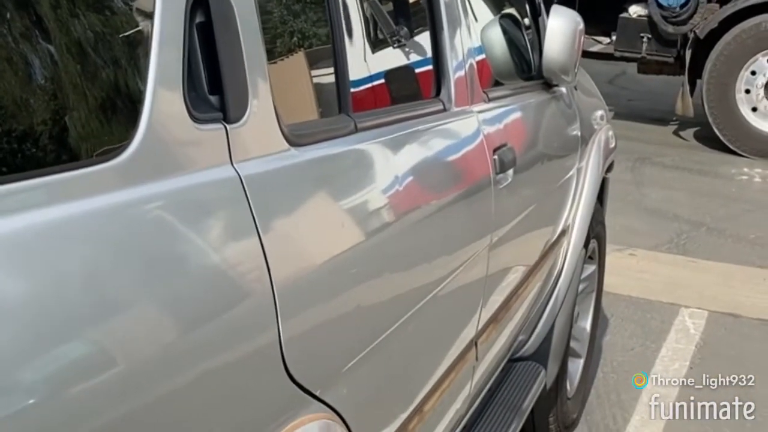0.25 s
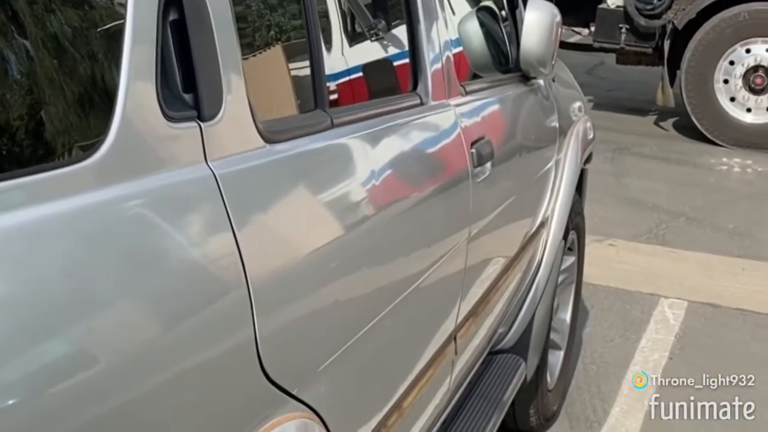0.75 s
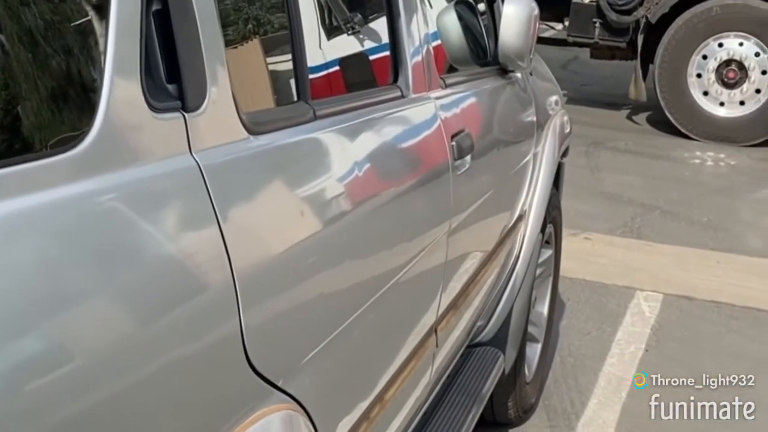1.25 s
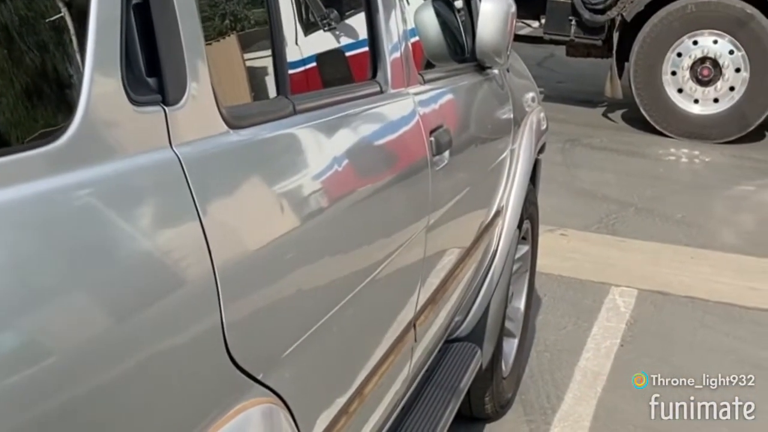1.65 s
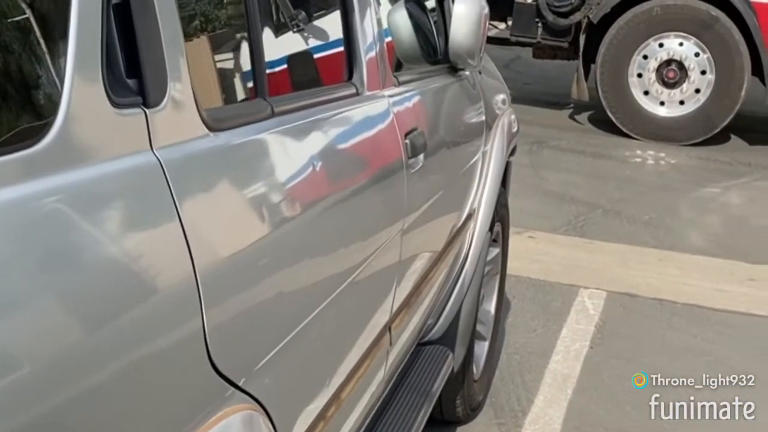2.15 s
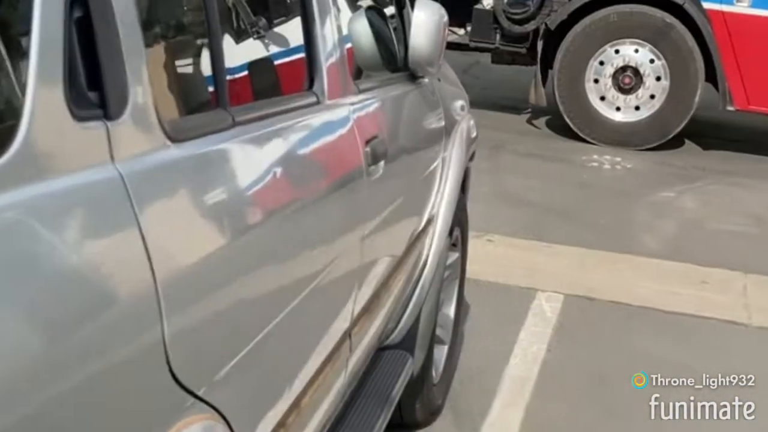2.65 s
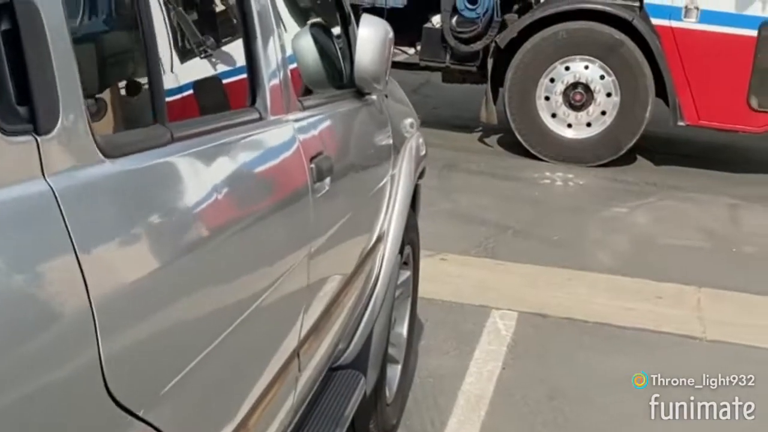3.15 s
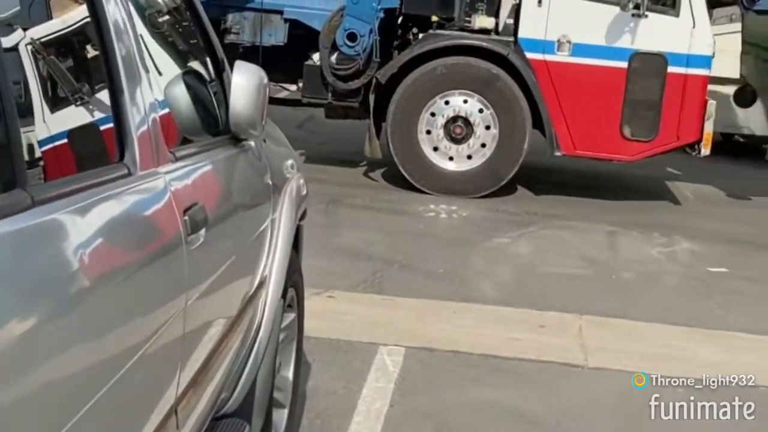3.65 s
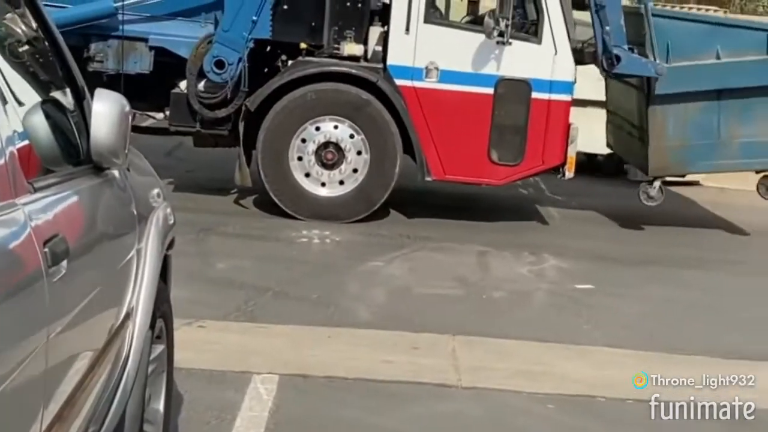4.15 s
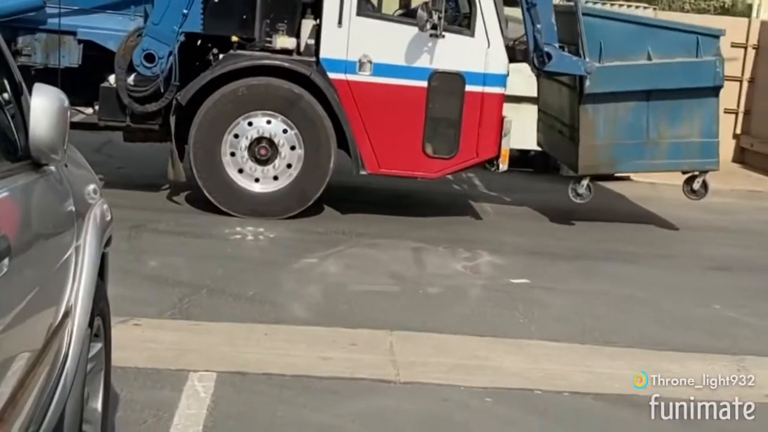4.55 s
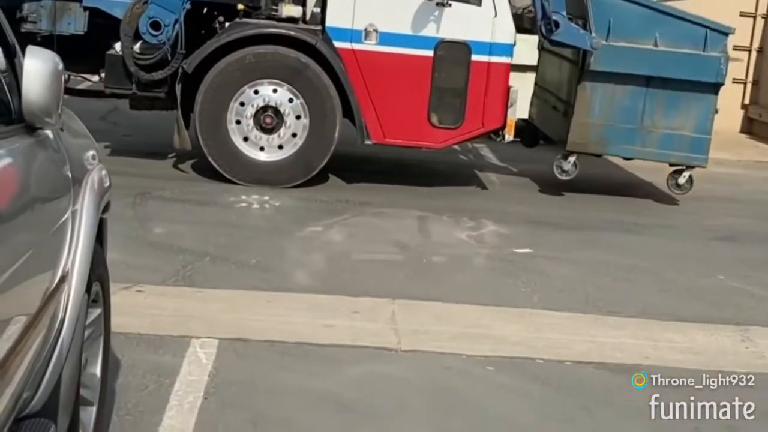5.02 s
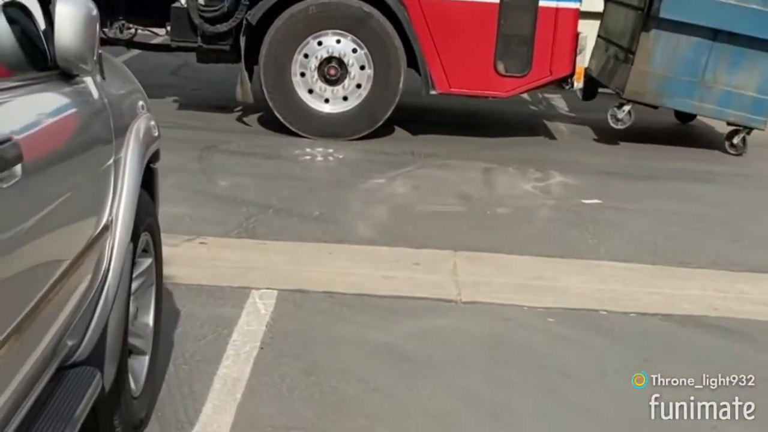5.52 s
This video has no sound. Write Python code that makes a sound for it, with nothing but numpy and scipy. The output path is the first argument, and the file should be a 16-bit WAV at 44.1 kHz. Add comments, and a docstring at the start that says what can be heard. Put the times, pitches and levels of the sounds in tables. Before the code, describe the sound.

Across a parking lot, a garbage truck's diesel rumbles under a wavering hydraulic pump whine. A brief clattering knock comes early, then squeaks and soft bumps. Near four seconds oil hiss surges and the steel dumpster slams in a rapid run of booming bangs with rattling lids and pins; another cluster follows after five seconds. Outdoor stereo microphone, a few metres away, short scattered echoes.

```python
"""A bin knocks over a fast diesel and its whining pump: a front-loading refuse truck lowers a dumpster.
The scene is a parking lot, heard from behind a parked car. Crank-locked tones, chopped noise and
narrow resonances make the truck; valves hiss and dry pivots squeal. The bin bangs on the forks:
damped modes and dying noise boom from its walls, while grit, loose lids, casters and a pin rattle along.
Scattered echoes and a two-port microphone set it in stereo."""
import sys
import numpy as np
from scipy import signal
from scipy.fft import rfft, irfft, next_fast_len
from scipy.io import wavfile
from scipy.ndimage import uniform_filter1d, minimum_filter1d

SR = 44100
rng = np.random.default_rng(int(sys.argv[2]) if len(sys.argv) > 2 else 0)


def bounce(signal):
    """Save signal as a 16-bit WAV file at the path given by the first command-line argument."""
    frames = np.transpose(np.atleast_2d(signal))
    limited = np.clip(frames, -1, 1)
    pcm = np.round(limited * 32767).astype(np.int16)
    wavfile.write(sys.argv[1], SR, pcm)


N = 254846
TIME = np.arange(N) / SR  # s

# echoes of the yard: (frequency [Hz], t60 [s])
YARD_T60 = [(60, 0.044), (500, 0.24), (2000, 0.45), (10000, 0.18)]
# engine and fan roar, relative spectrum: (frequency [Hz], density [dB per Hz])
ROAR = [(20, 13), (35, -20), (55, 4), (110, -4), (200, -3.5), (350, -10), (520, -6), (750, -19.5),
        (1300, -25), (1900, -24), (2700, -35.5), (4000, -29.5), (8000, -94)]
# the roar grows with the weight on the arms: (time [s], level [dB])
LOAD = [(0, -24), (.75, -26), (1.4, -28.5), (3.9, -31), (4.5, -22.5), (5.1, -29.5), (5.78, -26.5)]
# resonances that sing in the running truck: (frequency [Hz], width [Hz], level [dB])
SINGING = [(1010, 45, -59.5), (1770, 60, -56), (2030, 30, -54), (2690, 51, -66.5)]
# oil hissing through the valves, relative spectrum: (frequency [Hz], density [dB per Hz])
HISS = [(1000, -9), (2500, 2), (3800, -2.5), (5300, -0.5), (7000, 2.5), (8700, 1), (10300, 0),
        (11800, -15.5), (13500, -2), (16000, -21)]
# the oil hisses steadily, and surges when a valve opens to drop the bin
HISS_DB = -47
# surge start [s], height before its fade [dB], opening time [s], fade time constant [s]
VALVE_S, VALVE_DB, VALVE_OPEN_S, VALVE_FADE_S = 3.71, 9, 0.19, 0.29
# the pump's whine follows the engine speed: (time [s], pitch [Hz], level [dB])
PUMP_WHINE = [(0, 563, -39.5), (.6, 591.7, -49), (.72, 606, -34), (.87, 600.4, -41.5), (.98, 599, -30.5),
              (1.17, 624, -42.5), (1.45, 619.6, -41), (1.65, 609.6, -32.5), (2.2, 582.5, -36),
              (2.5, 569, -37), (2.75, 562.4, -35), (3.05, 570.7, -40), (3.35, 577.5, -40.5),
              (3.65, 577, -41), (3.9, 563.9, -38), (5.78, 579.9, -47)]
PUMP_ORDER = 21  # whine cycles per crank turn
# steady tones of the drive: (multiple of crank speed [ratio], level [dB])
DRIVE_ORDERS = [(2, -49.5), (3, -42.5), (4.5, -45.5), (6, -50), (10, -48), (15, -42.5), (18, -69),
                (24.5, -55), (42, -52.5), (51, -71), (63, -55), (84, -100)]
# the drive's tones come clear past the parked car: (time [s], gain [dB])
DRIVE_LEVEL = [(0, -1), (1.9, -6), (2.5, -2.5), (3.3, 1), (3.9, 1.5), (5.78, -4.5)]
# valves and dry pivots squeal or rasp: (time [s], length [s], pitch [Hz], width [Hz], level [dB])
SQUEALS = [(0.152, 0.24, 2250, 164, -45), (0.732, 0.16, 2223, 88, -44), (1.097, 0.73, 2052, 443, -51),
           (1.505, 0.23, 1060, 238, -43), (1.8, 0.57, 1950, 500, -49), (2.166, 0.34, 2302, 45, -61),
           (2.621, 0.21, 1721, 990, -42), (3.251, 0.77, 1174, 129.2, -47.5), (3.489, 0.14, 1380, 90, -44),
           (3.581, 0.26, 1460, 900, -43), (3.346, 0.53, 2850, 350, -51.5), (5.163, 0.12, 2037, 109.9, -40),
           (5.28, 0.13, 1050, 200, -29)]
# loose lids, chains and casters: (time [s], level [dB], share of ringing [0-1])
CLINKS = [(0.048, -37, 0.01), (0.182, -37, 0), (0.72, -39.5, 0), (0.972, -39, 0.41), (4.244, -33, 0.05),
          (4.775, -41, 0.01), (5.027, -42.5, 0.01), (5.183, -45, 0.01), (5.345, -36, 0.6), (5.361, -32, 0)]
# the small steel they ring with: (frequency [Hz], level [dB], t60 [s])
LATCH = [(2050, -21, 0.27), (6030, 1.5, 0.17), (5830, 18, 0.081), (8100, 7, 0.17), (11200, 2, 0.053),
         (10560, 19, 0.33)]
# a loose pin rattles in the arms: (time [s], length [s], level [dB], overtone [dB])
PINGS = [(0.405, 0.039, -29, -10), (.465, 0.047, -42, -4), (0.525, 0.026, -32, -21), (3.985, 0.17, -33, -6),
         (4.081, 0.015, -25, -23), (4.095, 0.025, -31, -1), (4.125, 0.082, -33, 3), (4.282, 0.048, -33, -3),
         (4.335, .05, -43, -9), (4.416, 0.065, -38, -6), (5.353, 0.028, -39, -15)]
# the pin's tone and overtone: (frequency [Hz], t60 [s])
PIN = [(4770, 0.11), (8850, 0.068)]
# sharp steel cracks and short clatter at the blows: (time [s], length [s], level [dB], pitch [Hz], t60 [s])
CLATTER = [(0.34, .02, -17, 598, 0.081), (0.356, .012, -25, 4350, 0.04), (.364, .025, -19, 377, .14),
           (0.382, 0.036, -33, 1914, 0.092), (.41, 0.062, -32, 947, .1), (3.977, 0.079, -31, 2820, .07),
           (3.981, .07, -29, 1245, 0.082), (4.082, 0.019, -32, 2290, 0.054),
           (4.152, 0.011, -15, 1317, .035), (4.153, 0.0069, -19.5, 2890, 0.026),
           (4.185, 0.12, -34.5, 2416, 0.09), (4.323, 0.027, -20.5, 1806, 0.038),
           (4.324, 0.0099, -26, 3390, 0.024), (4.345, 0.049, -26, 945, .1), (5.248, .04, -26, 1206, 0.09),
           (5.269, .03, -21, 260.7, 0.13), (5.299, .09, -36.5, 1505, 0.067),
           (5.41, 0.065, -40.5, 1205, 0.063)]
# the bin strikes the forks: (time [s], strength [dB], hardness [dB per octave], struck spot's pitch [Hz],
# extra wall boom [dB], extra grit [dB], clang level [dB], clang pitch [Hz])
BLOWS = [(0, -42, 0.2, 230, 0.5, 10, -49, 494), (.163, -45.5, 1.1, 229, 3.5, 11, -34, 590),
         (0.342, -31, 2, 560, -10, 6, -29.5, 2000), (.347, -34, 2.5, 445, -19, -5, -19, 623),
         (.353, -38.5, 1, 303, -10, 0, -21.5, 218), (.360, -35, 2.5, 308, -5, 12, -27.5, 1050),
         (.425, -44, -2, 400, 9.5, -5, -25, 384), (.594, -38, 0.4, 393, -3, 7, -43, 1530),
         (.68, -39, 0, 271, 8, 0, -50, 1190), (1.115, -42, 1.06, 103.9, 1, 12.5, -61, 1110),
         (1.654, -45, 2.5, 726, -2, 7, -40, 1019), (2.171, -47, 1.7, 472.4, 2, -2, -44, 1740),
         (3.957, -35.5, 3, 388, -2, 6.5, -36, 1340), (3.962, -24, 0.5, 257.4, -4.5, -3, -28, 1370),
         (4.077, -27, 1, 70, 0.5, 2, -34.5, 1360), (4.150, -27.5, 2, 166, -3, -1, -21, 1394),
         (4.156, -34, 2, 320, 6, 1, -19, 318), (4.222, -32, 1, 70, 1.5, 4, -21.5, 166),
         (4.321, -27.5, 1.5, 800, -6, 5.5, -26, 3430), (4.333, -32.5, 1, 147.2, -4.5, -7, -24, 1110),
         (4.415, -34.5, -1.5, 190, -12, -10, -24, 188), (4.523, -33, 0.5, 714, -2, 10, -27, 442),
         (4.625, -36, -2, 163.9, 1.5, -2, -41, 1330), (4.70, -33, -0.2, 68.9, -2, -7, -28, 320.1),
         (4.85, -39.5, -5, 103.2, -6.5, 0, -51, 1211), (5.243, -36.5, 2.5, 210.3, -7, 8, -33, 1330),
         (5.262, -33, -1.5, 227.5, -9, -7, -16.5, 212), (5.33, -35, -0.5, 193, -2, -4, -28, 200),
         (5.389, -35, 0, 110, 4, -5, -24.5, 284), (5.475, -35.5, -1.2, 128, 1, 16.5, -37, 1195),
         (5.541, -46.5, 0.5, 177, -13, 17, -32.5, 497), (5.703, -34.5, 0.5, 159.2, 1, -10, -37, 1306)]
# hard blows grind: (grit pitch [Hz], level at a full crack [dB], growth [dB per dB of crack], t60 [s])
GRIT = [(7470, -23, 1.5, 0.096), (3220, -21, 2, 0.063), (1480, -19.5, 2, 0.062)]
FULL_CRACK_DB = -23
# the forks' own stiff ring: (frequency [Hz], level [dB], t60 [s])
FORKS = [(1324, 0.5, 0.042), (1460, -11, 0.083), (1900, 6.5, 0.079), (2830, -13, 0.087), (2920, -4, 0.093),
         (3163, 5.5, 0.057), (3760, -11, 0.12), (3930, -7, 0.07), (7600, -2, 0.1), (8390, 6.5, 0.061)]
# contact crack, wall boom, large panels, small panels, ribs, frame clang:
# (low edge [Hz], high edge [Hz], level [dB])
PARTS = [(2150, 14600, -7.5), (57, 130.4, 7), (153, 252.6, 2.5), (279.3, 462, 2.5), (429, 712, -3),
         (844, 2070, -4)]
# hardness tilts a blow about PIVOT_HZ; the parts tuned near the struck spot answer most
PIVOT_HZ, SPOT_DB, SPOT_OCTAVES = 264, 10, 0.71
# the steel bin's strongest modes: (frequency [Hz], level [dB], t60 [s])
BIN = [(59.28, 6, 0.85), (72.7, -4.5, 1.44), (126.6, -10.5, 2.5), (155.9, -15.5, 2.1), (183.8, -2.5, 1.05),
       (202.2, -6.5, 2.27), (212.3, 3, 0.66), (271.5, -3.5, 1.56), (306.5, -2, 0.53), (324.7, -7, 0.97),
       (356, -8.5, 1.22), (419.3, -6, 0.84), (438.2, -4, 0.26), (466, -7.5, 0.35), (492.3, -8, 0.8),
       (568.5, -3, 0.46), (592.4, -7.5, 0.77), (626, -15.5, 0.25), (759, -1.5, 0.27), (1012, -11, 0.37),
       (1073, -9, 0.33), (1150, -19, 0.6), (1310, -17.5, 0.17), (1366, -14, 0.17), (1423, -17, 0.57),
       (1522, -15, 0.47), (1563, -23, 0.97), (1750, -10, 0.36), (1865, -22, 0.27), (2080, -11, 0.14),
       (2550, -29, 0.19), (2800, -5, 0.21), (2870, -9, 0.12), (3240, -17, 0.1), (3620, -17, 0.12),
       (4020, -5, 0.13), (4860, -18, 0.092)]
# its countless weaker modes: (frequency [Hz], relative density [dB per Hz])
DENSE = [(45, -3), (105, 1.5), (200, 17), (600, 7), (850, 10), (1400, 7), (2300, 2.5), (3000, 11),
         (4400, 16), (6000, 7), (8300, -5.5), (11000, -5), (15000, -70)]
# how long the weaker modes last: (frequency [Hz], t60 [s])
DENSE_T60 = [(60, 10), (200, 1.83), (400, 1.06), (620, 0.87), (1000, 1.16), (2000, 0.46), (4000, 0.028),
             (12000, 0.45)]
# tone of the two microphone ports: (frequency [Hz], left minus right [dB])
LEAN = [(60, 1.5), (110, 1.5), (200, 1.5), (380, 3.0), (700, 4.5), (1290, -2.0), (2380, -2.0), (4400, 0.0),
        (8120, 0.0), (15000, 0.0)]
# phase between the ports, before an easing in the bass: (frequency [Hz], left port's lead [rad])
PORT_PHASE = [(220, 0), (620, -0.7), (1640, -0.0), (3450, 2.4), (4050, 2.4), (6290, 3.8), (7410, 5.3),
              (7670, 6.1), (9560, 6.7), (11100, 9.5), (12400, 9.5), (13100, 10.4), (14000, 12.6),
              (15800, 12.6)]
EDGE_HZ = 15900  # upper band limit


def amp(db):
    """Decibels to amplitude."""
    return 10 ** (np.asarray(db) / 20)


def unit(x):
    """Scales a sound to rms 1."""
    return x / np.sqrt(np.mean(x ** 2) + 1e-20)


def read(points, hz):
    """A spectrum's value at hz, on a log-frequency axis."""
    f, value = np.transpose(points)
    return np.interp(np.log(hz + 1), np.log(f + 1), value)


def curves(rows):
    """Each column of a table of times, sample by sample."""
    s, *columns = np.transpose(rows)
    return [np.interp(TIME, s, column) for column in columns]


def add(mix, s, sound):
    """Lays a sound into the mix at s seconds."""
    part = mix[max(round(s * SR), 0):][:len(sound)]
    part += sound[:len(part)]


def coloured(x, gain):
    """Filters x by gain, a function of frequency."""
    size = next_fast_len(x.shape[-1] + 2048)
    spectrum = rfft(x, size) * gain(np.fft.rfftfreq(size, 1 / SR))
    return irfft(spectrum, size)[..., :x.shape[-1]]


def drift(rate):
    """Smooth chance of rms 1 that changes about rate times a second."""
    knots = rng.standard_normal(4096)
    return unit(np.interp(TIME * rate, np.arange(len(knots)), knots))


def dying_noise(t60, size):
    """Noise in which each frequency dies at its own speed."""
    hz, t, z = signal.stft(rng.standard_normal(size), SR, nperseg=512)
    dying = z * amp(-60 * t / read(t60, hz)[:, None])
    return signal.istft(dying, SR, nperseg=512)[1][:size]


def ringing(modes, t):
    """Damped sines of a struck object."""
    return sum(amp(db - 60 * t / t60) * np.sin(2 * np.pi * hz * t) for hz, db, t60 in modes)


def retuned(ring, spread):
    """The same ring a little higher or lower: loose steel never rings twice at quite one pitch."""
    at = np.arange(len(ring))
    return np.interp(at * (1 + spread * rng.uniform(-1.003, 1)), at, ring, right=0)


def yard(x, sparse_hz=360):
    """Scattered echoes from asphalt, walls and cars, different at each ear and sparse in the bass."""
    tails = np.array([unit(dying_noise(YARD_T60, size=32768)) for _ in range(2)])
    tails = coloured(tails, lambda f: f ** 2 / (f ** 2 + sparse_hz ** 2)) / np.sqrt(tails.shape[1])
    return signal.oaconvolve(x[None], tails, axes=1)[:, :N]


def whirring(crank, size=1536, low_hz=900):
    """The same fine clatter comes round with every turn of the crank: a comb of faint machine tones."""
    one_turn = rng.standard_normal(size)
    repeated = np.interp(crank % 1 * size, np.arange(size), one_turn)
    return coloured(unit(repeated), lambda f: f ** 2 / (f ** 2 + low_hz ** 2))


def truck(crank, knock=0.041, lope=0.071, swell_db=0.7, whirr=1, wander=0.005, fitful_db=3):
    """A six-cylinder diesel: roar chopped by three uneven firings a turn, whirr, resonances, oil hiss."""
    roar_db, = curves(LOAD)
    since = np.maximum(TIME - VALVE_S, 0)
    surge = np.minimum(since / VALVE_OPEN_S, 1) * np.exp(-since / VALVE_FADE_S)
    hiss_db = HISS_DB + VALVE_DB * surge

    firing = 1 + knock * np.cos(2 * np.pi * 3 * crank) + lope * np.cos(2 * np.pi * crank)
    rumble = rng.standard_normal(N) * firing + whirr * whirring(crank)
    roar = unit(coloured(rumble, lambda f: amp(read(ROAR, f))))
    hiss = unit(coloured(rng.standard_normal(N), lambda f: amp(read(HISS, f))))

    song = np.zeros(N)
    for hz, width, db in SINGING:
        turn = 2 * np.pi * np.cumsum(hz * (1 + wander * drift(9))) / SR
        level = amp(db + fitful_db * drift(5.46))
        # two drifting quadratures make a narrow band of noise
        song += level * (drift(2 * width) * np.sin(turn) + drift(2 * width) * np.cos(turn))
    return song + amp(roar_db + swell_db * drift(9.8)) * roar + amp(hiss_db) * hiss


def pump(flutter=0.00221, waver=0.21, hum_waver=0.31, rough=0.2, backlash_turns=0.003):
    """The pump's whine and the drive's hum, both locked to the crank; also returns the crank's turns."""
    pump_hz, pump_db = curves(PUMP_WHINE)
    crank = np.cumsum(pump_hz * (1 + flutter * drift(29.96))) / SR / PUMP_ORDER

    def tone(order, depth):
        """A tone at a multiple of crank speed, loosened by backlash and wavering in level."""
        turns = order * (crank + backlash_turns * drift(45))
        return np.sqrt(2) * np.sin(2 * np.pi * turns) * (1 + depth * drift(19))

    churn = drift(70) * np.cos(2 * np.pi * PUMP_ORDER * crank)  # churning oil roughens the whine
    whine = amp(pump_db) * (tone(PUMP_ORDER, waver) + rough * churn)
    hum = sum(amp(db) * tone(order, hum_waver) for order, db in DRIVE_ORDERS)
    return whine, amp(curves(DRIVE_LEVEL)[0]) * hum, crank


def squeals(clear_hz=60, waver_hz=12, waver_per_s=25, slip_db=2, slips_per_s=110):
    """Squeals that swell and fade: the narrow ones sing on a wavering pitch, the wide ones rasp."""
    t, out = TIME[:32768], np.zeros(N)
    for s, length, hz, width, db in SQUEALS:
        rush = coloured(rng.standard_normal(len(t)), lambda f: 1 / (1 + (2 * (f - hz) / width) ** 4))
        pitch = hz + waver_hz * np.interp(t * waver_per_s, np.arange(64), rng.standard_normal(64))
        song = np.sin(2 * np.pi * np.cumsum(pitch) / SR)
        sound = unit(rush) + (clear_hz / width) ** 2 * song
        sound *= amp(slip_db * drift(slips_per_s)[:len(t)])  # the pivot sticks and slips
        swell = signal.windows.tukey(int(np.clip(length * SR, 64, len(t))), .7)
        add(out, s, amp(db) * unit(sound[:len(swell)]) * swell)
    return out


def clinks(scrape=0.077, scrape_t60=0.072, low_hz=3500, rise_s=0.0022):
    """Small steel parts slide together: a short bright scrape and a thin ring."""
    t, out = TIME[:16384], np.zeros(N)
    for s, db, ring in CLINKS:
        # the scrape takes a brightened form of the hiss spectrum
        grit = coloured(rng.standard_normal(len(t)), lambda f: amp(read(HISS, f)) * f / (f + low_hz))
        scraping = scrape * unit(grit) * amp(-60 * t / scrape_t60)
        sound = ring * retuned(ringing(LATCH, t), spread=0.0077) + scraping
        sound = sound * (1 - np.exp(-t / rise_s))
        add(out, s, amp(db) * sound / np.std(sound[:1024]))
    return out


def tapping(length, per_s, uneven, settle=0.5):
    """A run of sharp taps of uneven strength and spacing that settles as it goes; the first lands at once."""
    t = TIME[:8192]
    chance, strength = rng.random(len(t)), rng.standard_normal(len(t))
    lands = (chance < per_s / SR) & (t < length)
    lands[0] = True
    return lands * np.sign(strength) * np.exp(uneven * abs(strength) - settle * t / length)


def pings(taps_per_s=500, uneven=0.6):
    """A loose pin, jolted by the bangs, chatters in its hole: every tap renews its thin, high ring."""
    t, out = TIME[:8192], np.zeros(N)
    (low_hz, low_t60), (high_hz, high_t60) = PIN
    for s, length, db, overtone_db in PINGS:
        modes = [(low_hz, 0, low_t60), (high_hz, overtone_db, high_t60)]
        ring = retuned(ringing(modes, t), spread=0.0063)
        sound = signal.oaconvolve(tapping(length, taps_per_s, uneven), ring)
        add(out, s, amp(db) * sound / np.std(sound[:round(length * SR) + 256]))
    return out


def cracks_and_clatter(taps_per_s=40, uneven=0.44, octaves=0.3, count=4):
    """Sharp steel cracks and short clatter: several edges, each with its own short ring, tap in turn."""
    t, out = TIME[:6144], np.zeros(N)
    for s, length, db, hz, t60 in CLATTER:
        sound = np.zeros(24576)
        for edge in range(count):
            steps = rng.uniform(-2, 2, size=5)
            ring = ringing([(hz * 2 ** (octaves * step), 0, t60) for step in steps], t)
            late = length * edge / count
            add(sound, late, signal.oaconvolve(tapping(length - late, taps_per_s, uneven), ring))
        add(out, s, amp(db) * sound / np.std(sound[:round(length * SR) + 256]))
    return out


def part_levels(db, hardness, spot_hz):
    """How loudly each part of the bin answers a blow, in dB."""
    low, high, own_db = np.transpose(PARTS)
    centre = np.sqrt(low * high)
    near = np.exp(-(np.log2(centre / spot_hz) / SPOT_OCTAVES) ** 2)
    return db + own_db + hardness * np.log2(centre / PIVOT_HZ) + SPOT_DB * near


def rattle(t, per_s, t60, tap_s):
    """Loudness of the small, uneven rebounds that follow a blow."""
    lands = rng.random(len(t)) < per_s / SR
    taps = rng.exponential(1, len(t)) * lands * amp(-60 * t / t60)
    return signal.lfilter([1], [1, -np.exp(-1 / (tap_s * SR))], taps)


def grinds(octaves=1.0, ring=0.39, rise_s=0.00023, rebound=0.4):
    """Steel slips and rebounds on steel: bursts of grit, heard directly and through the ringing forks."""
    t, out = TIME[:12288], np.zeros(N)
    forks = ringing(FORKS, t)
    forks = forks / np.linalg.norm(forks)
    for s, strength_db, hardness, spot_hz, _, grit_db, *_ in BLOWS:
        crack_db = part_levels(strength_db, hardness, spot_hz)[0] - FULL_CRACK_DB
        rebounds = rebound * rattle(t, per_s=390, t60=0.44, tap_s=0.0014)
        for hz, db, growth, t60 in GRIT:
            # a broad hump around the grit's pitch
            hump = lambda f: 1 / (1 + (np.log2((f + 1) / hz) / octaves * 2) ** 2)
            grains = rng.standard_normal(len(t)) * rng.exponential(1, len(t))
            grit = unit(coloured(grains, hump))
            grit = grit * (amp(-60 * t / t60) + rebounds) * (1 - np.exp(-t / rise_s))
            rung = signal.oaconvolve(grit, retuned(forks, spread=0.0096))[:len(t)]
            level = amp(db + grit_db + growth * crack_db)
            add(out, s, level * (grit + ring * rung) / np.hypot(1, ring))
    return out


def clangs(octaves=0.25, rise_s=0.00076, buzz=0.73, buzz_per_s=160, damping_hz=2000, damping_s=0.035):
    """The steel under a blow clangs: bin modes around one pitch stand out and buzz against the fork."""
    t, out = TIME[:24576], np.zeros(N)
    for s, *_, db, clang_hz in BLOWS:
        near = [(hz, own_db - 6 * (np.log2(hz / clang_hz) / octaves) ** 2, t60)
                for hz, own_db, t60 in BIN if .5 < hz / clang_hz < 2]
        # the contact roughens and damps high clangs most
        height = clang_hz / damping_hz
        wobble = np.interp(t * buzz_per_s, np.arange(256), rng.standard_normal(256))
        ring = retuned(ringing(near, t), spread=0.0068) * (1 + buzz * height * wobble)
        ring = ring * (1 - np.exp(-t / rise_s)) * np.exp(-t * height / damping_s)
        add(out, s, amp(db) * ring / np.std(ring[:2048]))
    return out


def dumpster(dense_db=7, chatter=0.34, chatter_s=0.023, rise_cycles=0.45, rise_s=0.00035,
             shove_s=0.0085, soft_db=-47, uneven_db=3, mode_gap_hz=45):
    """Each blow chatters briefly and rings the whole bin; where it lands decides which parts answer most."""
    t = TIME[:65536]
    modes, out = ringing(BIN, t), np.zeros(N)
    bands = [np.clip(part[:2], 20, SR / 2.1) for part in PARTS]
    filters = [signal.butter(4, band, "band", fs=SR, output="sos") for band in bands]
    early = t < .05
    # the weaker modes cluster unevenly, the same way in every blow
    clusters = rng.standard_normal(1024)

    def colour(f):
        """Spectrum of the weaker modes; the clustering fades out in the bass."""
        lumps = np.interp(f / mode_gap_hz, np.arange(len(clusters)), clusters) * f / (f + 600)
        return amp(read(DENSE, f) + dense_db + uneven_db * lumps)

    for s, strength_db, hardness, spot_hz, boom_db, *_ in BLOWS:
        levels = part_levels(strength_db, hardness, spot_hz)  # contact crack first, then the walls
        levels[1] += boom_db
        touches = rng.standard_normal(2048) * (rng.random(2048) < .015)
        force = chatter * touches * np.exp(-t[:2048] / chatter_s)
        force[0] = 1
        ring = signal.oaconvolve(retuned(modes, spread=0.0174), force)[:len(t)]
        ring = ring + coloured(dying_noise(DENSE_T60, size=len(t)), colour)
        # a blow with little crack is a soft shove and builds slowly
        contact_s = rise_s + shove_s / (1 + amp(levels[0] - soft_db) ** 2)
        for db, sos, (low_hz, *_) in zip(levels, filters, PARTS):
            # large, slow plates take longer to get moving
            rise = 1 - np.exp(-t / (contact_s + rise_cycles / low_hz))
            part = signal.sosfilt(sos, ring) * rise
            add(out, s, amp(db) * part / np.std(part[early]))
    return out


def microphones(x):
    """Two ports colour the sound differently; through the treble it reaches the left one sooner."""
    side = np.array([[.5], [-.5]])
    # long waves reach both ports alike
    lead = lambda f: read(PORT_PHASE, f) * f / (f + 60)
    return coloured(x, lambda f: amp(side * read(LEAN, f)) * np.exp(1j * side * lead(f)))


def scene(truck_wet_db=-8, bin_wet_db=-8, glance=0.065, glance_ms=0.044):
    """Truck and bin, heard directly and off the surroundings."""
    whine, hum, crank = pump()
    motor = truck(crank) + squeals()
    steel = dumpster() + clangs() + grinds() + cracks_and_clatter() + clinks()
    direct = microphones(whine + hum + motor + steel + pings())
    # the whine also glances off the parked car's door and reaches the two ports out of step
    late_whine = np.interp(TIME - glance_ms / 1000, TIME, whine)
    glancing = glance * np.array([[1], [-1]]) * late_whine
    return direct + glancing + yard(amp(truck_wet_db) * motor + amp(bin_wet_db) * steel)


def record(dry, low_cut_hz=38):
    """The microphone loses the deepest bass, a quick limiter catches the bangs, then the band limit."""
    thinned = coloured(dry, lambda f: f ** 3 / np.sqrt(f ** 6 + low_cut_hz ** 6))
    allowed = np.minimum(1, .93 / (abs(thinned).max(0) + 1e-9))
    # hold the lowest gain around each peak, then smooth it
    limited = thinned * uniform_filter1d(minimum_filter1d(allowed, size=161), size=161)
    band_limit = signal.firwin(511, EDGE_HZ, window=("kaiser", 9), fs=SR)
    return signal.oaconvolve(limited, band_limit[None], "same", axes=1)


dry = scene()
out = record(dry)
bounce(out)
```